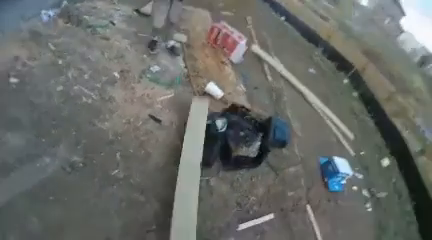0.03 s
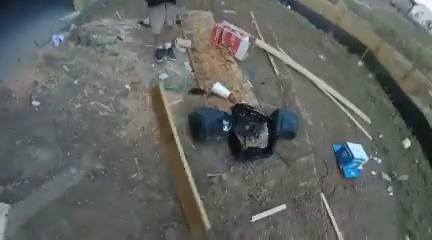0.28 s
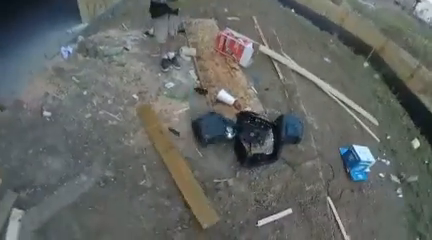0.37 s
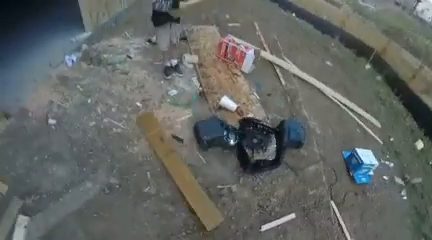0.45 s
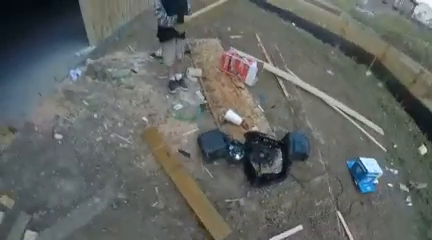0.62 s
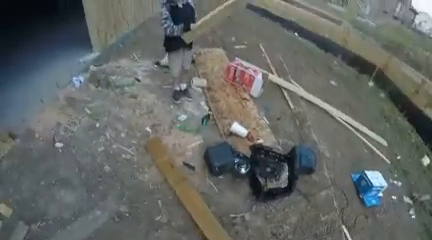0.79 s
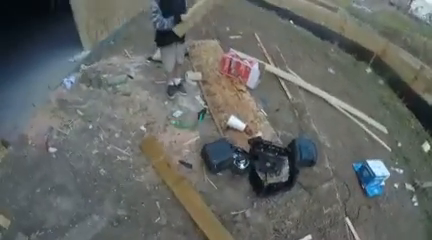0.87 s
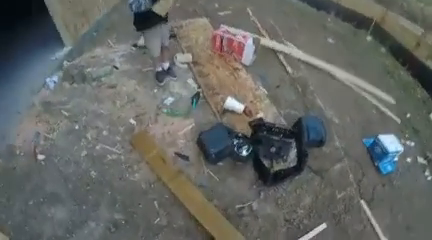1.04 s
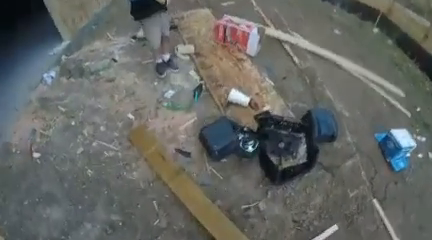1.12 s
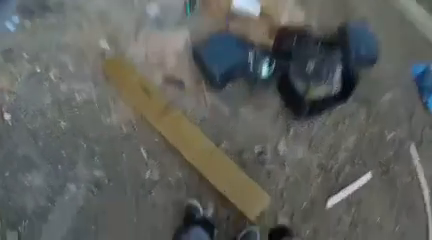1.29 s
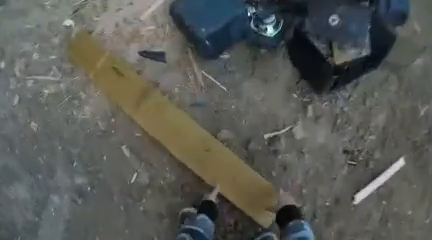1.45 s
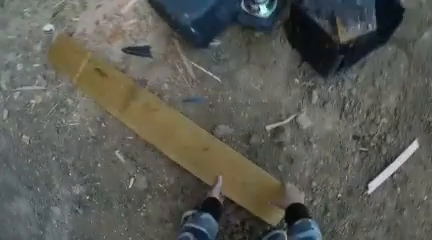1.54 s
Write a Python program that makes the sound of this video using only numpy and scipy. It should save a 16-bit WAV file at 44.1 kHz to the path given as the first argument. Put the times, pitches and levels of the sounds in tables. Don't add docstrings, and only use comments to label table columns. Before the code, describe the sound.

Hard plastic smash from one board blow outdoors, then broken pieces rattling, bouncing and pinging away

```python
import sys
import numpy as np
from scipy import signal
from scipy.fft import rfft, irfft
from scipy.io import wavfile
from scipy.ndimage import uniform_filter1d

SR = 44100
rng = np.random.default_rng(int(sys.argv[2]) if len(sys.argv) > 2 else 0)


def decibels_to_gain(level_db):
    exponent = np.asarray(level_db, float) / 20
    return 10 ** exponent


def store_pcm(level_fs):
    pcm = np.round(np.clip(level_fs, -1, 1) * 32767).astype(np.int16)
    wavfile.write(sys.argv[1], SR, np.atleast_2d(pcm).T)


N = 70560
TIME_S = np.arange(N) / SR


def evened(x):
    return x / np.sqrt(np.mean(x ** 2) + 1e-20)


def smoothed(x, length):
    return uniform_filter1d(uniform_filter1d(x, length), length)


def curve(rows, column):
    rows = np.array(rows)
    return np.interp(TIME_S, rows[:, 0], rows[:, column])


def shaped(points):
    f, db = np.transpose(points)
    hz = np.fft.rfftfreq(N, 1 / SR)
    gain = decibels_to_gain(np.interp(np.log(hz + 1), np.log(f + 1), db, left=-90))
    return evened(irfft(rfft(rng.standard_normal(N)) * gain, N))


def ring(x, hz, width_hz):
    return signal.lfilter(*signal.iirpeak(min(hz, SR / 2.2), hz / width_hz, SR), x)


def blow(start_s, rise_s, hold_s, t60_s):
    t = TIME_S - start_s
    return np.clip(t / rise_s, 0, 1) ** 2 * decibels_to_gain(-60 * np.maximum(t - rise_s - hold_s, 0) / t60_s)


def clicks(rate_per_s, spread_db):
    chance = rng.random(N)
    size = rng.exponential(1, N)
    sign = rng.choice([-1., 1.], N)
    return evened((chance < rate_per_s / SR) * sign * decibels_to_gain(spread_db * np.minimum(size, 4)))


def mode(start_s, level_db, hz, t60_s, rough=0.51):
    flutter = 1 + rough * evened(smoothed(rng.standard_normal(N), 150))
    force = decibels_to_gain(level_db) * blow(start_s, 0.0011, 0.002, t60_s)
    return force * flutter * np.sin(2 * np.pi * hz * (TIME_S - start_s))


def body(x, peaks, force=1):
    shared = 0.34
    shifts = rng.integers(500, N - 500, len(peaks))
    out = 0
    for k, (hz, width_hz, level_db) in enumerate(peaks):
        cracks = shared * x + (1 - shared) * np.roll(x, shifts[k])
        out = out + (-1) ** k * decibels_to_gain(level_db) * ring(cracks * force, hz, width_hz)
    return out


HOUSING_HZ = [910, 1050, 1370, 1685, 1780, 2100, 2560, 2760, 2890, 2980, 3380, 4400, 5050, 5450]
# width_hz, level_db
HOUSING_SHAPE = [(59.9, -8.5), (149.9, -13), (90.4, -6.5), (45.3, 1.5), (69.5, 0), (150.1, -0.5), (90, 1),
                 (51, 6), (58.5, 5.5), (60, -1.5), (101, -6), (370, -3.5), (340, -8), (250, -8)]
# pitch_hz, width_hz, level_db
SIZZLE = [(6320, 180, -8.5), (6700, 440, -9.5), (8210, 270, -3.5), (9610, 370, -1.5), (11550, 270, -14.5),
          (13000, 1200, -15)]


def plastic(x, dull, bright):
    broad_db, sizzle_db = -20.5, -22
    housing = [(hz, width_hz, db) for hz, (width_hz, db) in zip(HOUSING_HZ, HOUSING_SHAPE)]
    broad = signal.lfilter(*signal.butter(2, [800, 6500], "band", fs=SR), x * dull)
    y = body(x, housing, dull) + decibels_to_gain(broad_db) * broad + decibels_to_gain(sizzle_db) * body(x, SIZZLE, bright)
    y = signal.sosfilt(signal.butter(4, 820, "high", fs=SR, output="sos"), 4 * y)
    y = signal.lfilter(*signal.butter(2, 12500, fs=SR), y)
    return y - 0.36 * ring(y, 3700, 500)


# start_s, level_db
SNAPS = [(.2182, -22), (.2201, -19.5), (.2242, -15.5), (0.2259, -6.5), (0.2277, -1), (0.2298, -12),
         (.2315, -13), (0.2348, -7), (.2395, -8), (.2422, -12), (0.2487, -12), (.252, -11.5), (.2575, -13),
         (.263, -17), (.2745, -17)]
# pitch_hz, width_hz, level_db
THUD = [(100.7, 34, -13), (179, 86, -8), (290, 50, -2), (435, 48, 0.5)]
CABINET_HZ = [340, 900, 1000, 1372, 1680, 1767, 2156, 2760, 2848, 2895, 2981, 4300, 4458, 5027]
# level_db, t60_s
CABINET_RING = [(-31.5, 1), (-28.5, 1.5), (-7, .06), (-8, .1), (-5, .3), (-5.5, .12), (-12.5, 0.54),
                (-5.5, .3), (-9, .4), (0.5, 0.049), (-6.5, .15), (-7, .1), (-3.5, 0.061), (-10, 0.1)]


def smash():
    touch_s, touch_db, break_s, break_db = 0.2172, -18, 0.221, -12
    thud_db, snap_db, cabinet_db = -36, 13, -21.5
    touch = decibels_to_gain(touch_db) * blow(touch_s, 0.002, 0.0055, 0.011)
    fracture = blow(break_s, 0.003, 0.0034, 0.28) * blow(break_s, 0.00077, 0.031, 0.18)
    force = touch + decibels_to_gain(break_db) * fracture
    brightening = 1 + decibels_to_gain(16.0) * blow(break_s, 0.0024, 0.0036, 0.21)
    out = plastic(clicks(rate_per_s=5000, spread_db=-0.5), force, force * brightening)

    snaps = np.zeros(N)
    for k, (start_s, level_db) in enumerate(SNAPS):
        snaps[round(start_s * SR)] = (-1) ** (k + 1) * decibels_to_gain(level_db + snap_db)
    out += plastic(np.ones(N), snaps, snaps)

    thud = evened(body(rng.standard_normal(N), THUD))
    out += decibels_to_gain(thud_db) * thud * blow(touch_s, 0.003, 0.0033, 0.22)
    for hz, (level_db, t60_s) in zip(CABINET_HZ, CABINET_RING):
        out += mode(break_s + 0.004, level_db + cabinet_db, hz, t60_s, rough=0.35)
    return out


# start_s, level_db, brightness_db
SCATTER = [(.25, -24.5, 19), (.30, -34.5, 7.5), (.37, -38.5, 0), (.46, -37.5, -20), (.50, -47.5, -15),
           (.66, -53.5, -7), (.68, -55.5, -17), (.82, -60, -20), (.92, -62, -28), (.965, -62, -15),
           (1.03, -58.5, -12), (1.07, -59, -15), (1.1, -91.5, -11.5), (1.49, -75, -2), (1.52, -49.5, -23),
           (1.6, -79.5, -15)]


def scatter():
    rattle = decibels_to_gain(curve(SCATTER, 1)) * (TIME_S > 0.221)
    return plastic(clicks(rate_per_s=1600, spread_db=3.5), rattle, rattle * decibels_to_gain(curve(SCATTER, 2)))


# start_s, peak_db, pitch_hz, brightness_db, t60_s
BOUNCES = [(0.347, -42, 9330, 21.5, 0.028), (0.367, -31.5, 2750, -28, 0.09),
           (0.403, -39.5, 5230, -3, 0.088), (0.423, -35, 2895, -15, 0.067), (0.452, -41, 2900, 8, 0.093),
           (0.494, -36, 2750, -23, 0.04), (0.509, -42, 7060, -10, 0.035), (0.513, -36, 2520, 1, 0.018),
           (0.524, -40, 1880, -18, 0.04), (.542, -38.5, 5340, 10, 0.025), (0.561, -41, 2800, -8, 0.091),
           (.565, -37, 2570, 0, 0.054), (0.572, -45, 4850, -13, 0.067), (.604, -42.5, 5180, 11, 0.034),
           (.615, -43.5, 1750, -18, 0.092), (0.628, -38.5, 5200, 5, 0.028), (.645, -36, 2850, -20, 0.027),
           (0.653, -38, 2880, -24, 0.022), (0.707, -60, 9800, 5, 0.054), (0.7152, -38, 2870, 4.5, 0.052),
           (0.716, -49, 9750, 2, 0.036), (0.737, -51.5, 1860, -26, 0.076), (0.744, -47, 1356, -22, 0.066),
           (0.764, -38, 1940, -20, 0.034), (.766, -51, 4950, 0, .04), (0.7786, -44, 4370, 11.5, 0.055),
           (0.782, -35, 2527, -15, 0.027), (0.794, -47.5, 1870, -16, 0.078),
           (0.807, -53.5, 4750, -24, 0.042), (0.843, -52.5, 4740, -8, 0.093), (0.855, -48, 5450, 2, 0.06),
           (.86, -54, 8350, 0, 0.061), (0.929, -35.5, 4270, 2.5, 0.018), (0.935, -42.5, 2928, -30, 0.15),
           (0.976, -40.5, 2044, -20, 0.067), (.979, -49, 5000, -12, 0.038), (1.0, -45, 2630, -8, 0.061),
           (1.005, -42.5, 1830, -32, 0.057), (1.013, -46, 5050, -18, 0.038),
           (1.021, -42.5, 2810, -25, 0.056)]
# start_s, level_db
KNOCKS = [
    (0.588, -3),
    (0.741, -19),
]
# pitch_hz, level_db, t60_s
KNOCK = [(900, -48, 0.38), (1263, -42.5, 0.2), (1750, -27.5, 0.056), (2800, -36.5, 0.14)]
# start_s, level_db, pitch_hz, t60_s
PINGS = [(0.302, -55, 2895, .9), (0.299, -48, 1680, .6), (.508, -53, 7150, .04), (0.562, -42.5, 2927, 0.18),
         (0.5646, -38, 2550, .07), (.566, -48, 4800, 0.083), (0.715, -49, 2926, 0.16),
         (.842, -74, 4700, 0.063), (.9295, -35.5, 4160, 0.019), (.932, -41.5, 2930, 0.17),
         (1.0056, -44.5, 1778, 0.056), (1.555, -51, 1880, 0.086)]


def bounces():
    ping_t60_s = 0.081
    partials_db, tilt_db_per_octave = -18, -5
    out, dull, bright = np.zeros(N), np.zeros(N), np.zeros(N)
    chatter = clicks(rate_per_s=17000, spread_db=0.93)
    upper_hz = 4400 * 2 ** (1.4 * rng.random((len(BOUNCES), 5)))
    for (start_s, peak_db, hz, bright_db, t60_s), partials_hz in zip(BOUNCES, upper_hz):
        hit = blow(start_s, 0.0012, 0.00041, t60_s) * decibels_to_gain(peak_db)
        dull += decibels_to_gain(-7.5) * hit
        bright += decibels_to_gain(bright_db - 0.5) * hit
        out += 1.2 * ring(hit * chatter, hz, 190)
        out += 0.6 * min(t60_s / ping_t60_s, 1) * mode(start_s, peak_db, hz, 0.81 * t60_s)
        for f in partials_hz:
            level_db = bright_db + partials_db + tilt_db_per_octave * np.log2(f / 4000)
            out += decibels_to_gain(level_db) * 4 * ring(hit * chatter, f, 140)
    for start_s, blow_db in KNOCKS:
        dull += decibels_to_gain(blow_db - 70) * blow(start_s, 0.0013, 0.0017, 0.075)
        for hz, level_db, t60_s in KNOCK:
            out += mode(start_s, level_db + blow_db, hz, t60_s, rough=0.4)
    for start_s, level_db, hz, t60_s in PINGS:
        out += mode(start_s, level_db, hz, t60_s, rough=0.31)
    return out + plastic(chatter, dull, bright)


# start_s, peak_db, main_hz, second_hz, t60_s
TICKS = [(.9612, -27.5, 1420, 1010, 0.0074), (0.9677, -38, 2390, 2840, 0.0048),
         (0.9706, -39, 1920, 1330, 0.012), (1.4058, -25.5, 5370, 3400, 0.0036),
         (1.406, -39, 1073, 504, 0.0055), (1.41, -50, 1990, 1890, 0.025), (1.514, -40, 900, 2320, 0.0074),
         (1.528, -47, 1520, 2300, 0.08), (1.536, -46, 1970, 1530, 0.024), (1.547, -30, 2680, 2570, 0.012),
         (1.548, -23, 1177, 1026, 0.016), (1.5495, -38, 2060, 1970, 0.026), (1.554, -47, 950, 1930, 0.038),
         (1.585, -49, 2370, 5000, 0.008)]
# start_s, level_db, t60_s
SCUFFS = [
    (1.3, -56, .03),
    (1.527, -66, .05),
    (1.2, -52, .03),
    (.965, -55, .05),
]


def ticks():
    tones, tail, edge = np.zeros(N), np.zeros(N), np.zeros(N)
    for start_s, peak_db, main_hz, second_hz, t60_s in TICKS:
        t = np.maximum(TIME_S - start_s, 0)
        pair = np.sin(2 * np.pi * main_hz * t) + 0.63 * np.sin(2 * np.pi * second_hz * t)
        tones += decibels_to_gain(peak_db) * blow(start_s, 1 / main_hz, 0.0001, t60_s) * pair
        tail += decibels_to_gain(peak_db - 23) * blow(start_s, 0.0004, 0.00082, 0.016)
        edge[round(start_s * SR) + 4] += decibels_to_gain(peak_db - 7.5) * (main_hz / 5000) ** 2.8
    for start_s, level_db, t60_s in SCUFFS:
        tail += decibels_to_gain(level_db) * blow(start_s, 0.001, 0.002, t60_s)
    tones = signal.lfilter(*signal.butter(3, 630, "high", fs=SR), tones)
    edge = signal.lfilter(*signal.butter(2, 9000, fs=SR), edge)
    return tones + plastic(rng.standard_normal(N), tail, tail) + edge


# pitch_hz, level_db
RUMBLE = [(60, -6.5), (100, 5), (200, -1), (400, -9.5), (900, -43.5), (2000, -84.5)]


def jolt():
    start_s, level_db, pitch_hz = 1.503, -28.5, 97.6
    t = TIME_S - start_s
    turn = 2 * np.pi * pitch_hz * t * (1 - 1.36 * t)
    swing = np.sin(turn) + 0.084 * np.sin(1.9 * turn) + 0.084 * shaped(RUMBLE)
    return decibels_to_gain(level_db) * blow(start_s, 0.018, 0.026, 0.091) * swing


# start_s, level_db, length_s
PUSHES = [
    (1.334, -33, 0.082),
    (1.488, -33, 0.021),
    (1.551, -27, 0.037),
]


def pushes():
    out = np.zeros(N)
    for start_s, level_db, length_s in PUSHES:
        phase = np.clip((TIME_S - start_s) / length_s, 0, 1) ** 1.13
        out -= decibels_to_gain(level_db) * np.sin(np.pi * phase) ** 2
    return out


def swish():
    tone = evened(ring(rng.standard_normal(N), 1510, 120))
    return decibels_to_gain(-63) * blow(0.06, 0.04, 0.041, 0.2) * tone


# start_s, level_db
GUST = [(0.0, -43), (0.13, -37), (.22, -46.5), (.32, -60.5), (0.45, -58.5), (.7, -62.5), (.9, -52.5),
        (1.082, -51.5), (1.25, -54.5), (1.36, -40.5), (1.45, -45), (1.6, -35.5)]
# pitch_hz, level_db
WIND = [(8, 8.5), (20, 13.5), (35, -7.5), (60, -8), (100, -16), (170, -32), (300, -42), (700, -78.5)]


def wind():
    rumble_db, rumble_follow, lump_db = -62, 0.15, 0.5
    lumps = evened(smoothed(rng.standard_normal(N), 500))
    gust_db = curve(GUST, 1)
    buffet = shaped(WIND)
    buffet = buffet / np.sqrt(smoothed(buffet ** 2, 2200))
    duck_db = 7.6 * blow(0.221, 0.03, 0.47, 0.47)
    level_db = rumble_db + rumble_follow * (gust_db + 54.5) - duck_db + 1.5 * lumps
    rumble = decibels_to_gain(level_db) * shaped(RUMBLE)
    end_fade = np.clip((N - np.arange(N)) / 600, 0, 1)
    return (decibels_to_gain(gust_db + lump_db * lumps) * buffet + rumble) * end_fade


# pitch_hz, level_db
AIR = [(80, -25), (200, -11.5), (400, -8.5), (2400, -16.5), (6000, -27.5), (12000, -36.5), (14500, -49.5),
       (15800, -60)]


def air():
    return decibels_to_gain(-60) * shaped(AIR)


def scene():
    impact = smash() + scatter() + bounces()
    handling = ticks() + jolt() + pushes()
    return (impact + handling + swish() + wind() + air())[None]


def band_limit(x):
    return signal.sosfilt(signal.butter(12, 15940, fs=SR, output="sos"), x)


def record(dry):
    edge_hz = 15450
    padded = np.pad(np.clip(dry, -.93, .93), ((0, 0), (127, 127)), "reflect")
    lowpass = signal.firwin(255, edge_hz, window=("kaiser", 8), fs=SR)
    mix = signal.oaconvolve(padded, lowpass[None], "valid")
    return band_limit(mix)


dry = scene()
out = record(dry)
store_pcm(out)
```